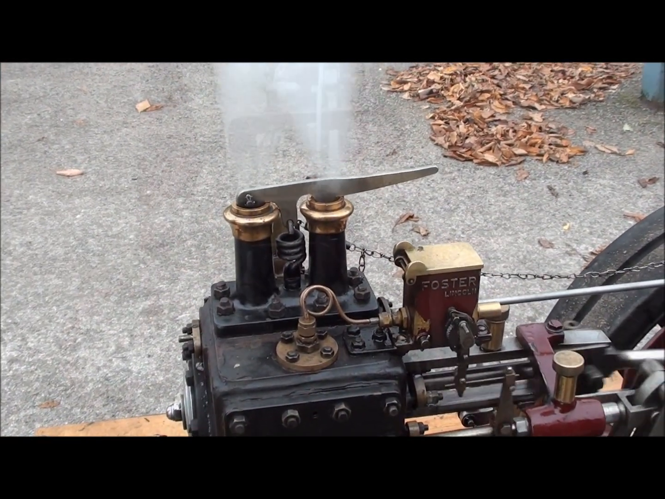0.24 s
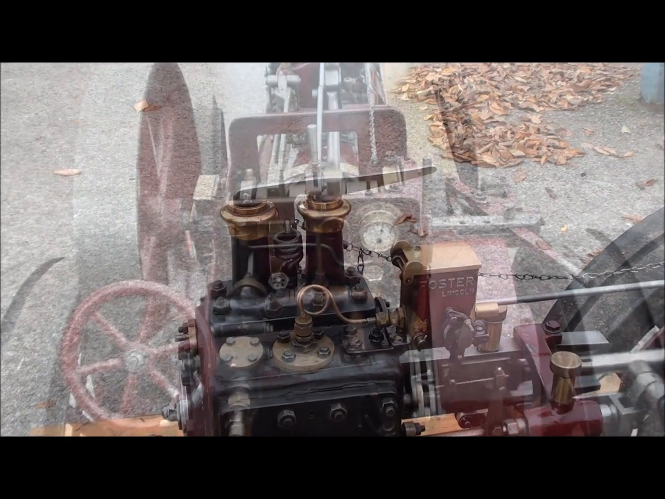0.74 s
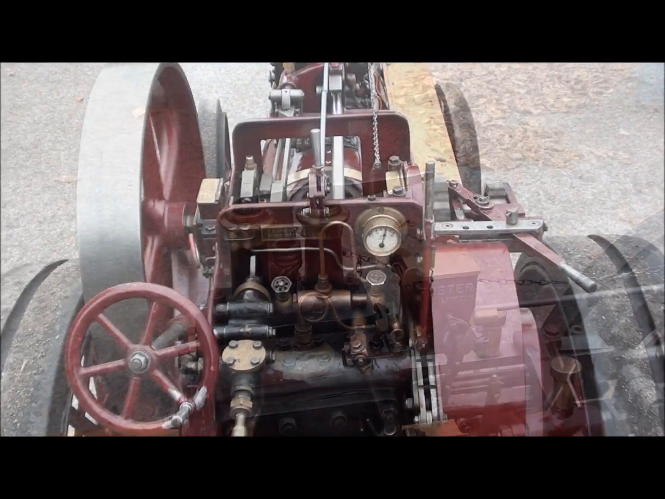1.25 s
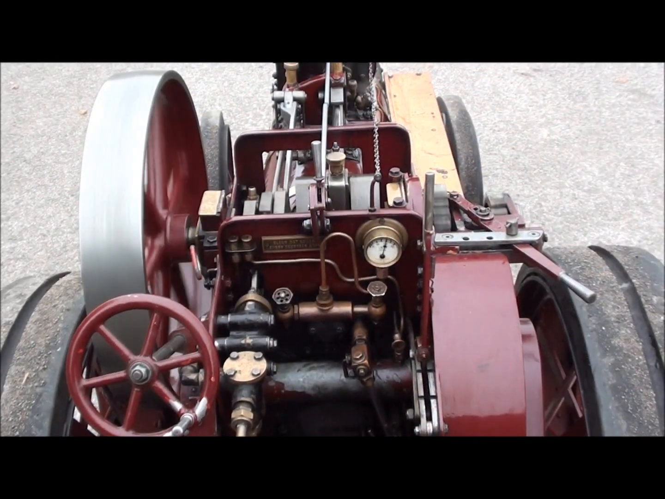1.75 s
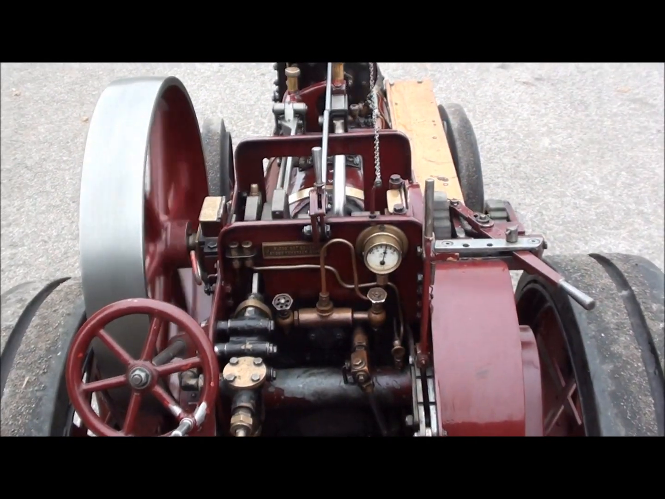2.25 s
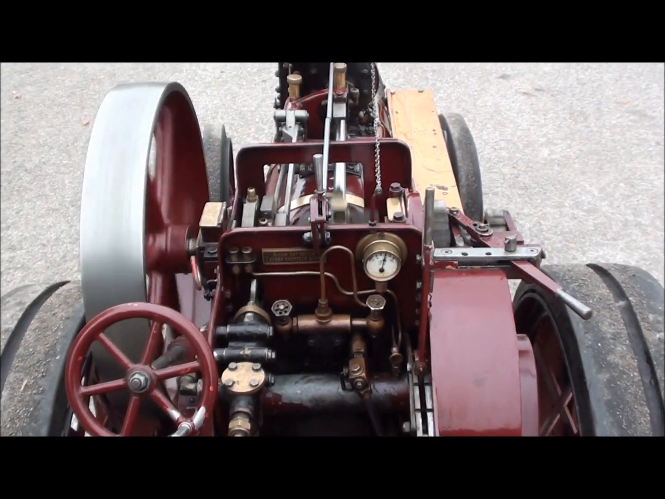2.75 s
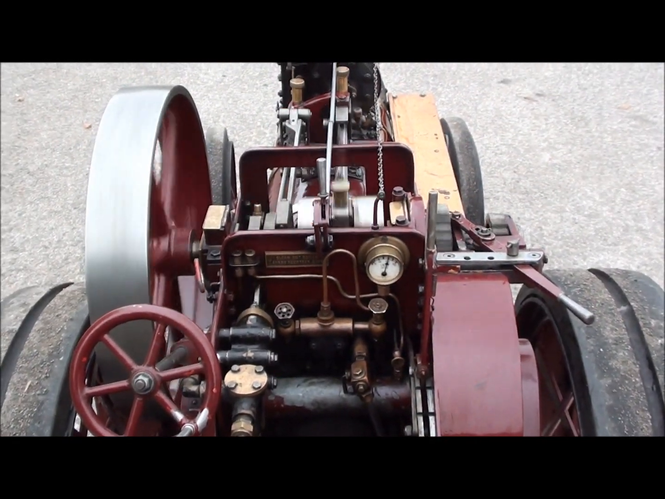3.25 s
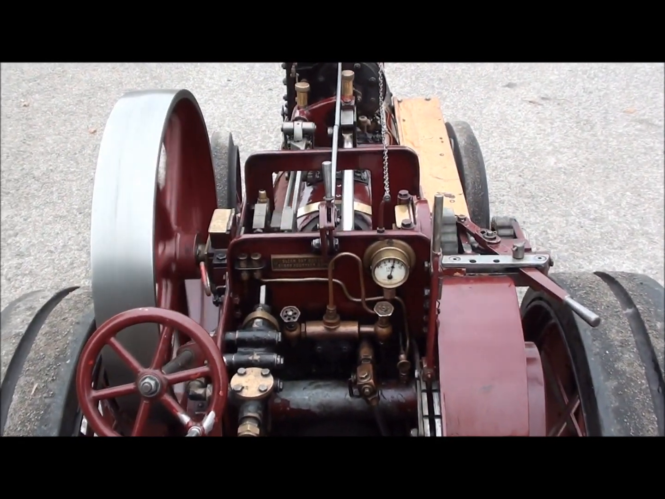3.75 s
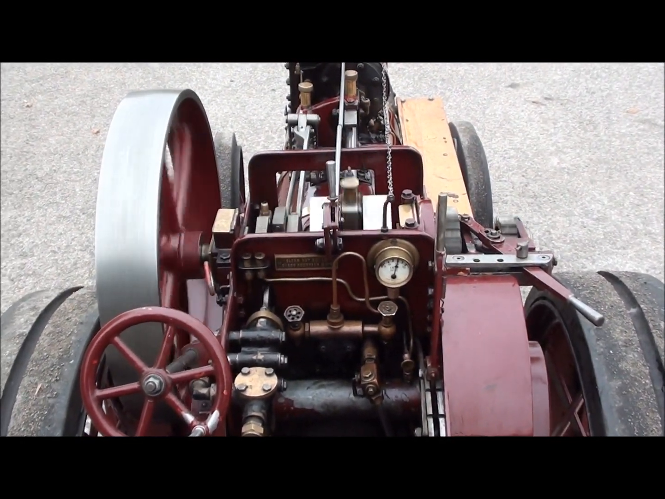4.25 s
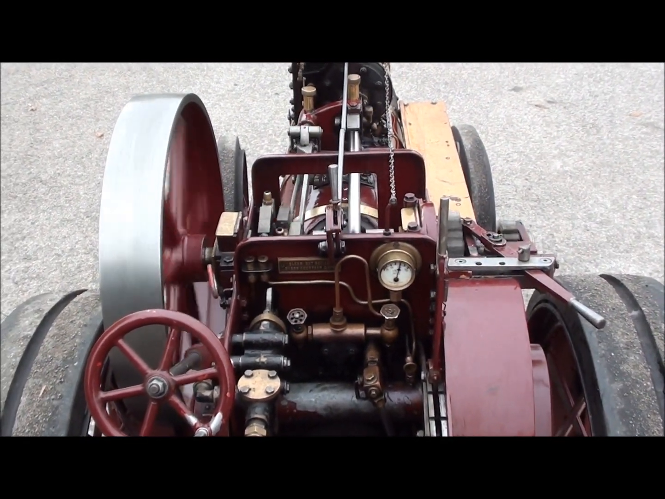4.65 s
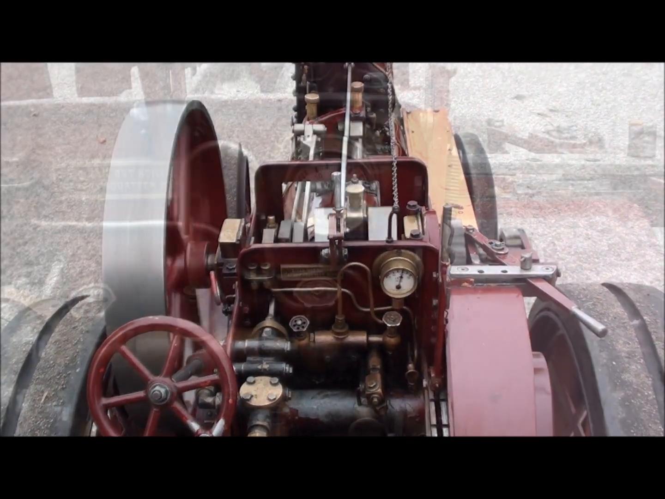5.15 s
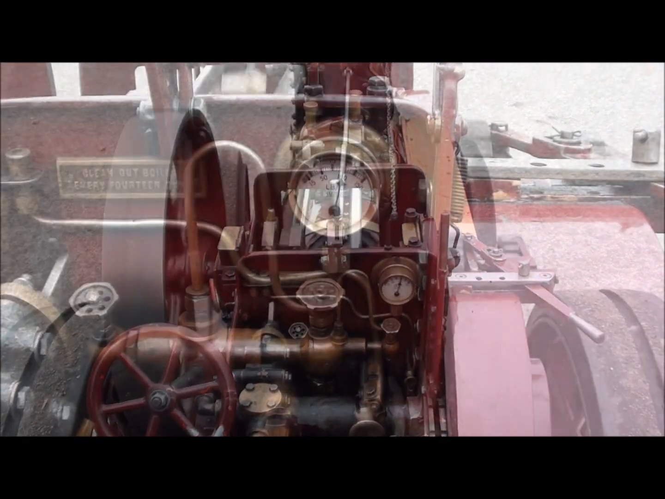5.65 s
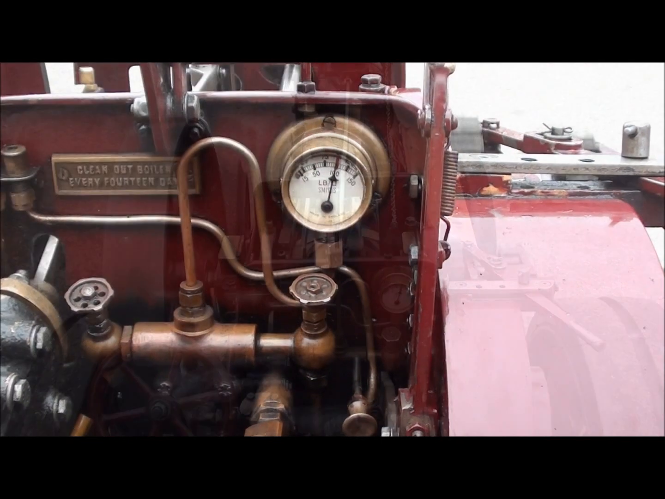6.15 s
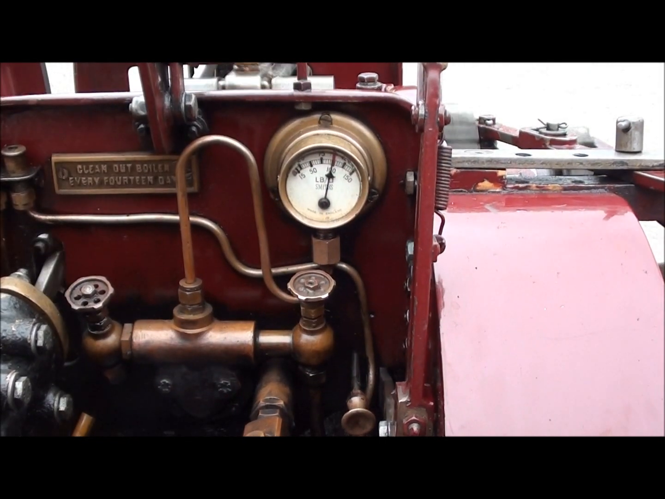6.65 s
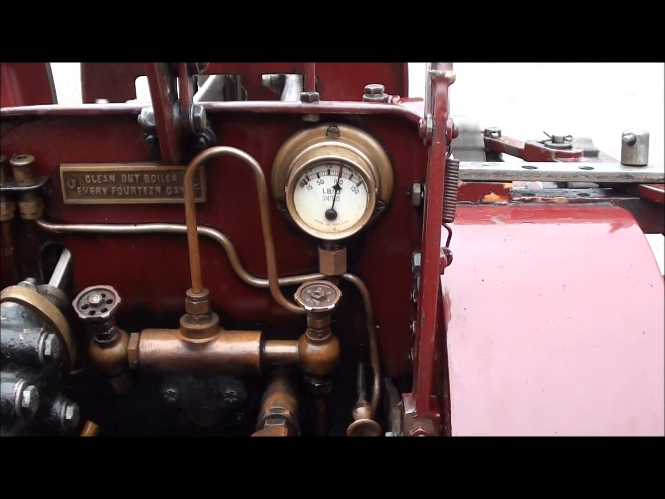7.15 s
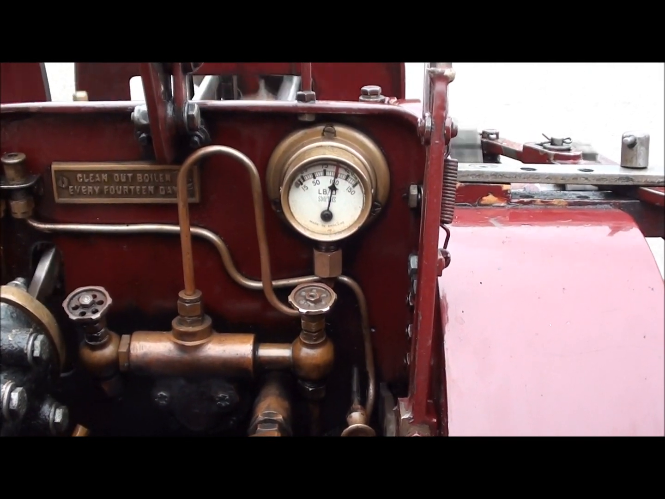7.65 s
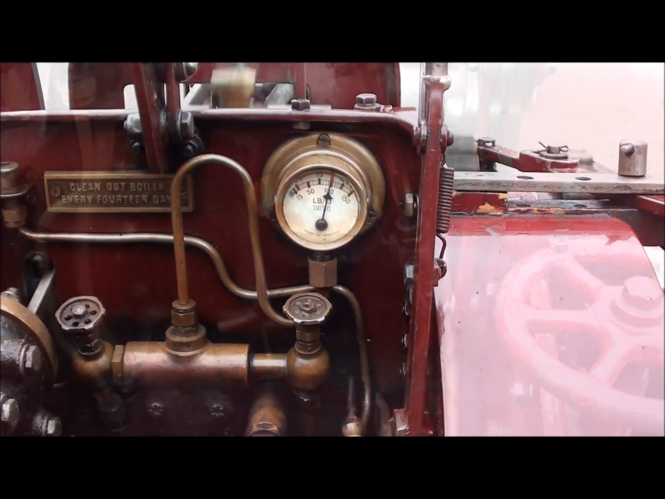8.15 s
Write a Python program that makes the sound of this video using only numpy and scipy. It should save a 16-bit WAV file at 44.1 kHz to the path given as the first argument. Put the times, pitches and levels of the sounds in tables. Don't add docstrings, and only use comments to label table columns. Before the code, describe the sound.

A small steam engine idles fast in the open, valves hissing constantly while iron knocks, gear rumble and exhaust puffs repeat about three turns a second.

```python
import sys
import numpy as np
from scipy import signal
from scipy.fft import rfft, irfft, next_fast_len
from scipy.io import wavfile
from scipy.ndimage import uniform_filter1d

SR = 44100
rng = np.random.default_rng(int(sys.argv[2]) if len(sys.argv) > 2 else 0)


def unload_audio(sound):
    columns = np.transpose(np.atleast_2d(sound))
    steps = np.round(np.clip(columns, -1, 1) * 32767)
    wavfile.write(sys.argv[1], SR, steps.astype(np.int16))


def amplitude_ratio(level_db):
    exponent = np.asarray(level_db, float) / 20
    return 10 ** exponent


N = 370881


def evened(x):
    return x / np.sqrt(np.mean(abs(x) ** 2) + 1e-20)


def read(points, hz):
    f, value = np.transpose(points)
    return np.interp(np.log(hz + 1), np.log(f + 1), value)


# start in seconds, end in seconds.
PLACE_SPAN_S = [
    (0, 1.768),
    (.762, 6.472),
    (5.455, 8.41),
]


def span(place):
    first, last = (min(round(s * SR), N) for s in PLACE_SPAN_S[place])
    return first, last - first


# turn number, time in seconds.
CRANK_TURN_S = [
    [(0, -.085), (5, 1.51)],
    [(0, .654), (8, 3.143), (14, 5.019), (18, 6.265)],
    [(0, 5.259), (10, 8.388)],
]
# seconds after the turn starts, for four knocks.
KNOCK_DELAY_S = [
    [-0.011, 0.058, 0.151, .196],
    [-0.0066, .053, .155, .193],
    [-0.0072, 0.0507, .155, .193],
]
KNOCK_LEVEL_DB = [
    [-33, -27, -30, -26],
    [-24.5, -21.5, -17.5, -15.5],
    [-19.5, -16.5, -14.5, -11],
]
# time in seconds, dB added to every blow.
LOAD_S_DB = [
    [(0, -4), (.6, 0.5), (1.7, -3.5)],
    [(.8, -3), (1.4, 0), (2.6, -2.5), (3.3, -0.5), (4.6, -2), (5.4, 1), (6.4, -1)],
    [(5.5, -0.5), (6.6, -0.5), (7.6, 1), (8.4, -1.5)],
]


def blows(place, knock):
    start_s, end_s = PLACE_SPAN_S[place]
    turn, mark_s = np.transpose(CRANK_TURN_S[place])
    s = np.interp(np.arange(turn[-1] + 1), turn, mark_s) + KNOCK_DELAY_S[place][knock]
    s = s[(s >= start_s) & (s < end_s)]
    load_db = np.interp(s, *np.transpose(LOAD_S_DB[place]))
    return s - start_s, KNOCK_LEVEL_DB[place][knock] + load_db


# time in seconds, hiss level in dB.
STEAM_S_DB = [
    [(0, -11.5), (.74, -11.5), (1.2, -14.5), (1.76, -12)],
    [(.77, -11.5), (1.3, -11.5), (1.9, -13), (2.4, -13.5), (3.7, -13), (4.25, -13.5), (5, -13),
     (5.9, -13.5), (6.4, -13)],
    [(5.46, -14.5), (6, -15), (6.6, -14), (7.85, -14.5), (8.41, -15.3)],
]
# frequency in Hz, density in dB per Hz.
JET_HZ_DB = [
    [(290, -57), (500, -7.5), (676, -9), (748, -7.5), (1220, -14.5), (1540, -9.5), (2020, -9.5),
     (2430, -13), (2980, -1), (4330, -1.5), (5680, -2.5), (6850, -3), (8880, -11.5), (10900, -13),
     (15600, -13.5)],
    [(290, -31.5), (500, -9), (716, -3.5), (1580, -13), (2580, -6), (3590, -5), (4520, -6), (5600, -2),
     (6110, -1), (7260, -4), (10100, -13), (13300, -15), (15600, -18)],
    [(290, -7), (500, 1.5), (770, -1), (1120, -9.5), (2080, -6.5), (2360, -6.5), (2730, -1), (3150, -4.5),
     (4140, -4.5), (4580, -1.5), (4990, -7), (5600, -2), (15600, -19.5)],
]
# centre in Hz, width in Hz, lift in dB.
MIRROR_HZ_HZ_DB = [
    [(2250, 100, 0), (5200, 200, -7.5), (5970, 400, -9.5), (9100, 420, -2.5), (10800, 300, 4)],
    [(3655, 120, -5), (4600, 350, 4), (5270, 73, -5), (6060, 160, -11), (6740, 180, -5), (8800, 640, 0.5),
     (13100, 470, 3.5)],
    [(2080, 130, 5), (2350, 99, -3.5), (2535, 70, -10.5), (3050, 230, -8), (3550, 120, -9.5),
     (4210, 190, -10), (4390, 240, 5), (5000, 130, 1), (5270, 440, 1), (6400, 640, -2.5),
     (10130, 950, -3.5), (14300, 1100, 2)],
]
DUCK_KNOCK_DB = [
    [.3, .3, .3, 0.66],
    [.4, 0.27, 0.25, 0.59],
    [.6, 1.2, .6, 4.3],
]
GLAND_SPIT_DB = [-2, 2, 8]
HOP, SIZE = 128, 512
HZ = np.fft.rfftfreq(SIZE, 1 / SR)


def jet(place, t):
    colour = read(JET_HZ_DB[place], HZ)
    for hz, width_hz, db in MIRROR_HZ_HZ_DB[place]:
        colour += db * np.exp(-((HZ - hz) / width_hz) ** 2)
    colour -= 7 * np.clip(np.log2(1800 / (HZ + 1)), 0, 3)
    colour -= 60 * (HZ < 300)
    colour -= 10 * np.log10(np.mean(amplitude_ratio(colour) ** 2 * (HZ > 2500) * (HZ < 14000)))
    colour += 0.8 * rng.standard_normal(len(HZ)) * (HZ > 3000)

    patches = uniform_filter1d(rng.standard_normal((len(HZ), len(t))), 12, 0)
    patches = evened(uniform_filter1d(patches, 20, 1))
    flutter = evened(uniform_filter1d(rng.standard_normal(len(t)), 8))

    dips = np.zeros(len(t))
    for knock in range(4):
        late_s = t - blows(place, knock)[0][:, None] - .003
        recovery = np.exp(-np.maximum(late_s, 0) / 0.036) * (late_s > 0)
        dips += DUCK_KNOCK_DB[place][knock] * recovery.sum(0)

    early = (t - blows(place, 3)[0][:, None] + 0.0088) / 0.0039
    spit_band = np.exp(-((HZ - 8000) / 2500) ** 2)[:, None]
    spit = GLAND_SPIT_DB[place] * np.exp(-early ** 2).sum(0) * spit_band

    bright = np.clip(HZ / 9000, .3, 1.3)[:, None]
    pressure = np.interp(t + PLACE_SPAN_S[place][0], *np.transpose(STEAM_S_DB[place]))
    level_db = colour[:, None] + pressure + spit + 0.88 * patches
    return amplitude_ratio(level_db + bright * 0.79 * flutter - bright ** 0.19 * dips)


def ring(x, hz, t60):
    pole = np.exp((2j * np.pi * hz - np.log(1000) / t60) / SR)
    return signal.lfilter([1], [1, -pole], x).imag


# rise in seconds, fall in seconds, bounce in seconds, bounce share.
CONTACT_S = [(0.0031, 0.0058, 0.011, 0.27), (0.0019, 0.0026, .021, 0.36), (0.0027, .006, 0.016, 0.26),
             (0.0019, 0.0055, 0.014, 0.52)]
KNOCK_GAIN_DB = [3, 4.5, 3]
BLOW_SCATTER_DB = [1, .5, .4]


def pushes(place):
    n, t = span(place)[1], np.arange(2205) / SR
    push = np.zeros((4, n + SR))
    for knock, (rise, fall, bounce, share) in enumerate(CONTACT_S):
        shape = (1 - np.exp(-t / rise)) * np.exp(-t / fall)
        shape = shape + share * np.interp(t - bounce, t, shape)
        shape = shape / shape.sum()
        for s, db in zip(*blows(place, knock)):
            blow_db = db + KNOCK_GAIN_DB[place] + BLOW_SCATTER_DB[place] * rng.standard_normal()
            push[knock, round(s * SR):][:len(t)] += amplitude_ratio(blow_db) * shape
    return push[:, :n]


# frequency in Hz, t60 in seconds, level in dB for each of four knocks.
VALVE_SIDE_MODES = [(300, 0.11, -8, -20, -26, -5), (365, 0.059, -1, 1, 2, -13),
                    (468, 0.03, -20, -8, -6, 10), (638, 0.02, -21, 11, -1, 16.5),
                    (759, 0.016, -10, 15, 4, 20.5), (972, 0.042, -18, 0, -20, 10),
                    (1510, 0.19, 3, 0, -21, -7)]
FOOTPLATE_MODES = [(205.3, 0.1, -4.5, -11, -24, -7.5), (250, 0.067, 3, -7, -17, -28),
                   (285.4, 0.078, -10, 2.5, -8, -0.5), (351.7, 0.051, 8, 4.5, 5, -20),
                   (385.7, 0.1, -5, 3.5, -3, -3.5), (544, 0.028, -39, -49, -40, 1),
                   (639, 0.035, -36, 8, -25, 2.5), (734, 0.022, -35, 9, -5, 6),
                   (790, 0.056, -31, 8, -49, -6.5), (914, 0.066, -17, 1, -9, -8),
                   (1173, 0.026, 12.5, -18, -1, -5), (1774, 0.04, 2.5, -2.5, -4.5, -51),
                   (2295, 0.17, -5.5, -2, -41, -35)]
GAUGE_SIDE_MODES = [(201.5, 0.23, -8, -7.5, -24, -6), (239.4, 0.091, 5, -9.5, -3, -26),
                    (282.4, 0.094, -17, 2.5, -0.5, 0.5), (362.7, 0.058, 7, -1, 4, -11),
                    (387.2, 0.083, 4, -1.5, 4, -5), (497, 0.043, -43, -4, -7, -2),
                    (635, 0.035, 1, 6, -25, 4), (708, 0.04, 8, 8, -16, -2),
                    (797.6, 0.035, -23, 10.5, -2, 0), (962, 0.16, -16, -9.5, -8, -12),
                    (1295, 0.064, -0.5, -7, -24, -23), (1431, 0.078, 0.5, -5, -5, -16),
                    (1686, 0.049, -5, -15, -11, -9), (2143, 0.06, -1.5, -11, -5, -32)]
FRAME_MODES = [VALVE_SIDE_MODES, FOOTPLATE_MODES, GAUGE_SIDE_MODES]
LOOSE_PARTS_DB = [
    [-22, -16, -24, -13],
    [-5, -15, -12, -13],
    [-4.5, -14, -10, -15.5],
]
EXHAUST_DB = [-36, -26, -26]
GEAR_LEVEL_DB = [-37.5, -29.5, -26.5]


def frame(place):
    n = span(place)[1]
    push = pushes(place)
    noise, teeth, steps = rng.standard_normal((3, n))
    wander = np.cumsum(.035 * steps)
    load = evened(signal.lfilter([1], [1, -np.exp(-1 / (0.045 * SR))], push.sum(0)))
    teeth = teeth * (0.39 + load)

    struck = np.concatenate([[0]] + [blows(place, knock)[0] * SR for knock in range(4)])
    struck = np.sort(struck).astype(int)
    last = struck[np.searchsorted(struck, np.arange(n), "right") - 1]
    since_s = (np.arange(n) - last) / SR

    knocks, gears = 0, 0
    for hz, t60, *db in FRAME_MODES[place]:
        drift = np.roll(wander, rng.integers(n))
        swing = np.cos(2 * np.pi * hz * since_s + drift - drift[last])
        knocks += ring(2 * amplitude_ratio(np.array(db)) @ push * swing, hz, t60)
        gears += amplitude_ratio(np.mean(db)) * ring(teeth, hz, t60)

    loose = uniform_filter1d(amplitude_ratio(np.array(LOOSE_PARTS_DB[place])) @ push, size=265) * SR / 10
    band = signal.butter(2, [550, 2100], "bandpass", fs=SR, output="sos")
    clatter = signal.sosfilt(band, noise * (loose + amplitude_ratio(EXHAUST_DB[place]) * load))
    iron = knocks + clatter + amplitude_ratio(GEAR_LEVEL_DB[place]) * evened(gears)
    no_bass = signal.butter(4, 165, "highpass", fs=SR, output="sos")
    return signal.sosfilt(no_bass, iron)


# frequency in Hz, level in dB.
SURROUNDINGS_HZ_DB = [(25, -27), (50, -15.5), (90, -6.5), (130, -6), (200, -2.5), (400, -8.5), (900, -45)]
RUMBLE_LEVEL_DB = [-47.5, -35.5, -29.5]


def rumble(place):
    length = span(place)[1]
    n = next_fast_len(length)
    colour = amplitude_ratio(read(SURROUNDINGS_HZ_DB, np.fft.rfftfreq(n, 1 / SR)))
    z = rfft(rng.standard_normal((2, n))) * colour
    both, side = irfft(z, n)[:, :length]
    side = .28 * side
    return amplitude_ratio(RUMBLE_LEVEL_DB[place]) * evened(np.array([both + side, both - side]))


# frequency in Hz, left minus right in dB.
LEAN_HZ_DB = [
    [(60, 0.0), (110, 0.5), (200, 0.0), (380, 0.0), (700, 0.5), (1290, 0.5), (2380, 1.5), (4400, 3.0),
     (8120, 0.0), (15000, 0.0)],
    [(60, 0.0), (110, -0.5), (200, 0.0), (380, 0.0), (700, 0.5), (1290, 0.5), (2380, 0.0), (4400, 2.0),
     (8120, 0.0), (15000, 0.0)],
    [(60, 0.0), (110, 0.0), (200, 0.0), (380, 0.5), (700, 1.0), (1290, 1.0), (2380, 1.5), (4400, 2.5),
     (8120, 0.0), (15000, 0.0)],
]
# frequency in Hz, likeness 0-1.
LIKENESS_HZ = [(60, .9), (200, .95), (400, .98), (800, .94), (1300, .945), (3600, .958), (4400, .93),
               (6800, .94), (8000, .94), (15000, .943)]
# frequency in Hz, radians by which left leads.
LEAD_HZ_RAD = [(0, 0), (780, .15), (1290, 0), (3600, 0), (4390, .1), (5400, -.25), (7800, 0), (15200, 0)]


def heard_at(place):
    first, n = span(place)
    _, t, iron = signal.stft(frame(place), SR, nperseg=SIZE, noverlap=SIZE - HOP)
    a, b = signal.stft(rng.standard_normal((2, n)), SR, nperseg=SIZE, noverlap=SIZE - HOP)[2]
    steam = jet(place, t)
    same = np.clip(read(LIKENESS_HZ, HZ), 0, .996)[:, None]
    port = (amplitude_ratio(read(LEAN_HZ_DB[place], HZ) / 2) * np.exp(.5j * read(LEAD_HZ_RAD, HZ)))[:, None]
    left = steam * a + iron
    stray = (steam + abs(iron) / np.sqrt(np.mean(abs(b) ** 2))) * b
    right = same * left + np.sqrt(1 - same ** 2) * stray
    ports = np.array([left * port, right / port])
    pair = signal.istft(ports, SR, nperseg=SIZE, noverlap=SIZE - HOP)[1][:, :n]
    out = np.zeros((2, N))
    out[:, first:first + n] = (pair + rumble(place)) * signal.windows.tukey(n, 200 / n)
    return out


# start in seconds, level in dB, frequency in Hz.
BUMP_S_DB_HZ = [(0.109, -37, 91.5), (0.419, -35, 91.5), (0.703, -38, 99.6), (0.801, -25, 109),
                (0.955, -31, 75.4), (1.308, -26, 140), (1.402, -28, 132), (1.719, -26, 118),
                (2.299, -26, 80.7), (2.376, -33, 80.7), (3.137, -19, 85), (3.604, -32, 118),
                (5.496, -23, 117), (6.201, -19, 105), (6.701, -41, 118), (7.429, -21, 100),
                (7.689, -28, 76)]


def bumps():
    out, t = np.zeros(N + SR), np.arange(4410) / SR
    for s, db, hz in BUMP_S_DB_HZ:
        swell = t / 0.005 * np.exp(1 - t / 0.0051)
        out[round(s * SR):][:len(t)] += amplitude_ratio(db) * swell * np.sin(2 * np.pi * hz * t)
    return out[:N]


# start in seconds, level in dB.
LINK_S_DB = [(5.451, -7), (5.477, -9), (5.503, -10), (5.756, -12), (5.796, -11), (5.821, -11), (5.845, -27),
             (5.964, -22), (7.044, -20), (8.277, -15), (8.294, -15), (8.318, -11)]
# frequency in Hz, t60 in seconds, level in dB.
LINK_HZ_S_DB = [(675, 0.049, -1), (763, 0.1, -2), (848, 0.11, -8)]


def loose_link():
    out, t = np.zeros(N + SR), np.arange(4410) / SR
    for s, db in LINK_S_DB:
        for hz, t60, share_db in LINK_HZ_S_DB:
            swing = np.sin(2 * np.pi * (hz * t + rng.random())) * (1 - np.exp(-t / 0.0017))
            out[round(s * SR):][:len(t)] += amplitude_ratio(db + share_db + 0.5 - 60 * t / t60) * swing
    return out[:N]


# frequency in Hz, side under mid in dB below which the band turns mono.
WIDTH_GATE_HZ_DB = [(300, -21), (900, -18), (1300, -13.6), (3500, -13.6), (4200, -18), (6900, -17),
                    (7900, -12.4), (15000, -12.6)]


def joint_stereo(x):
    halves = np.array([x[0] + x[1], x[0] - x[1]]) / 2
    mid, side = signal.stft(halves, nperseg=2048, noverlap=1024)[2]
    bins = 16
    power = []
    for z in (mid, side):
        band_power = (abs(z[:1024]) ** 2).reshape(-1, bins, z.shape[1]).sum(1)
        power.append(uniform_filter1d(band_power, size=3, axis=1))
    wander_db = 1.6 * evened(uniform_filter1d(rng.standard_normal(mid.shape[1]), size=3))
    gate_db = read(WIDTH_GATE_HZ_DB, (np.arange(1024 // bins) + .5) * bins * SR / 2048)
    keep = power[1] > power[0] * amplitude_ratio(2 * (gate_db[:, None] + wander_db))
    keep = np.repeat(keep, bins, axis=0)
    side = side * np.vstack([keep, keep[-1:]])
    side = signal.istft(side, nperseg=2048, noverlap=1024)[1][:N]
    return x.mean(0) + np.array([side, -side])


def scene():
    return sum(heard_at(place) for place in range(3)) + bumps() + loose_link()


def low_pass(x):
    return signal.sosfilt(signal.butter(12, 15710, fs=SR, output="sos"), x)


def record(dry):
    clipped = np.clip(dry, -1, 1)
    mix = joint_stereo(clipped)
    return low_pass(mix)


dry = scene()
out = record(dry)
unload_audio(out)
```